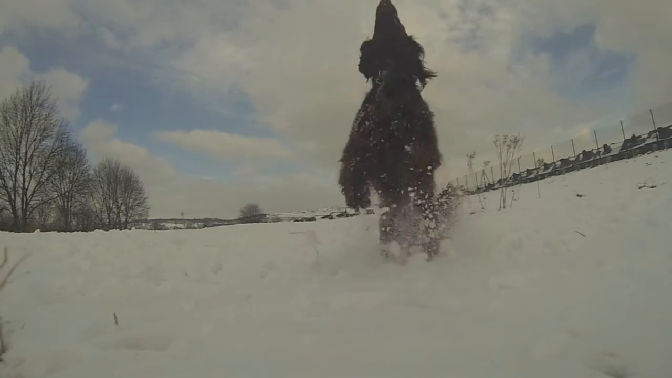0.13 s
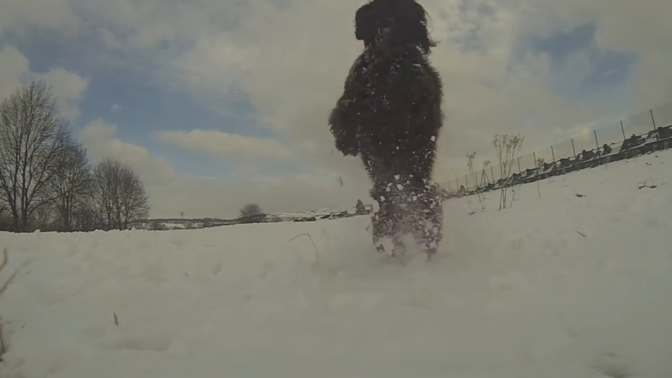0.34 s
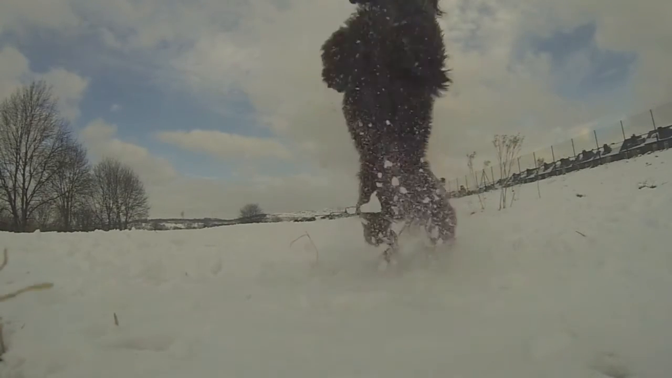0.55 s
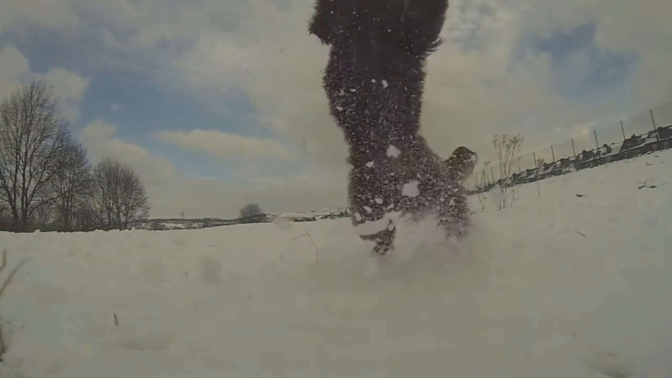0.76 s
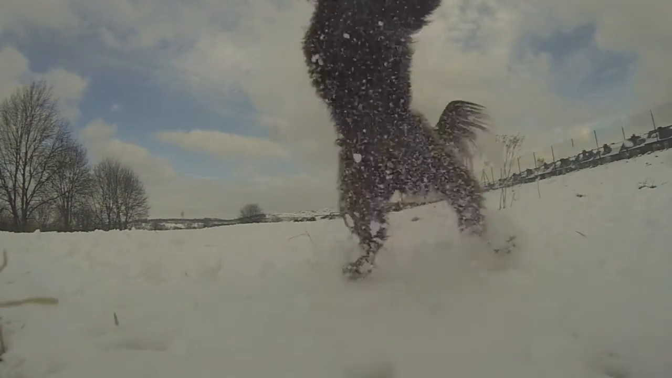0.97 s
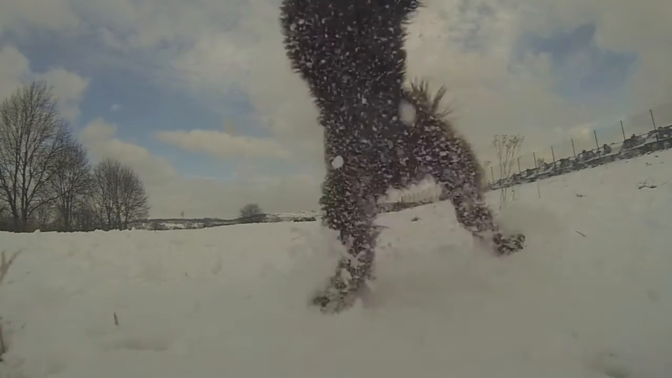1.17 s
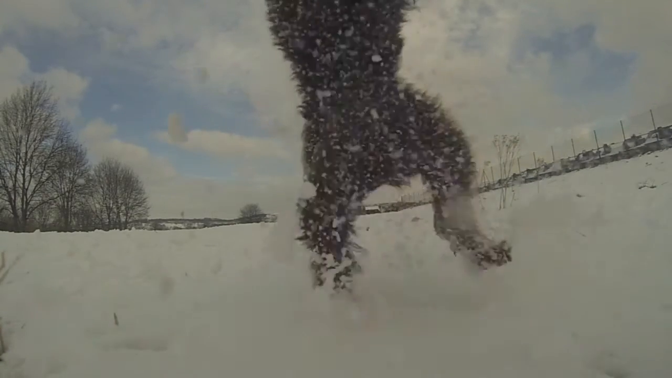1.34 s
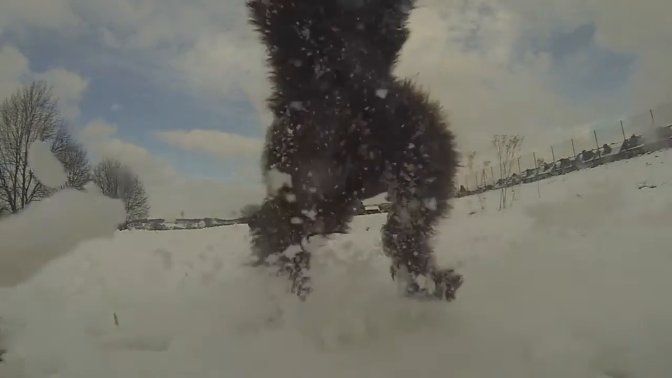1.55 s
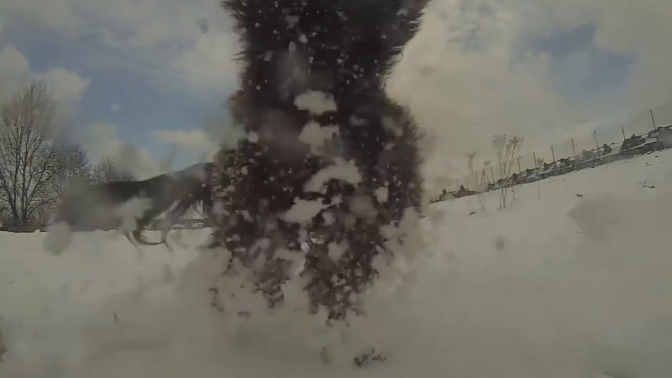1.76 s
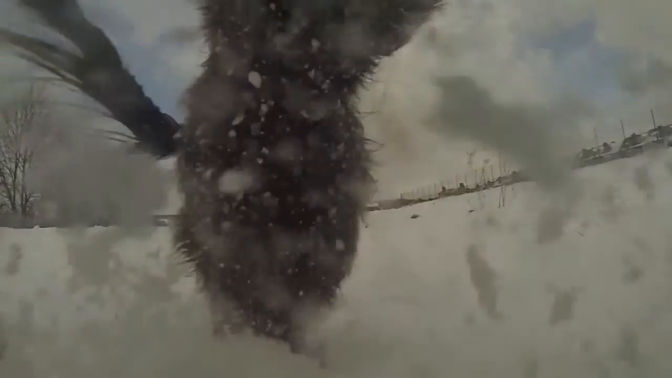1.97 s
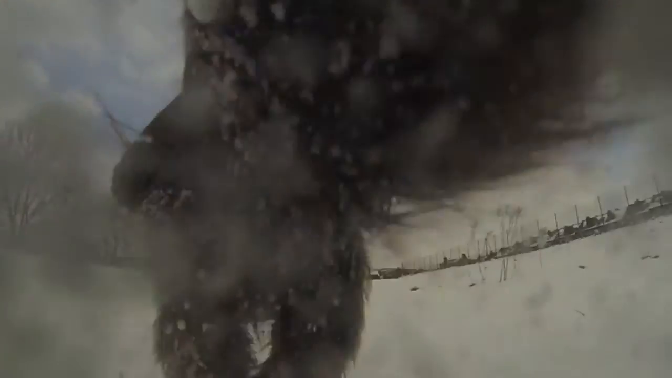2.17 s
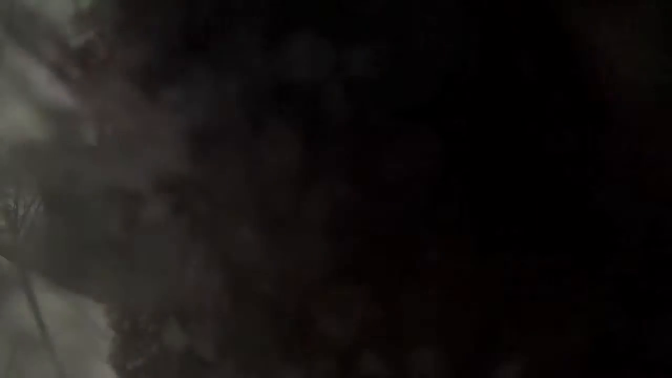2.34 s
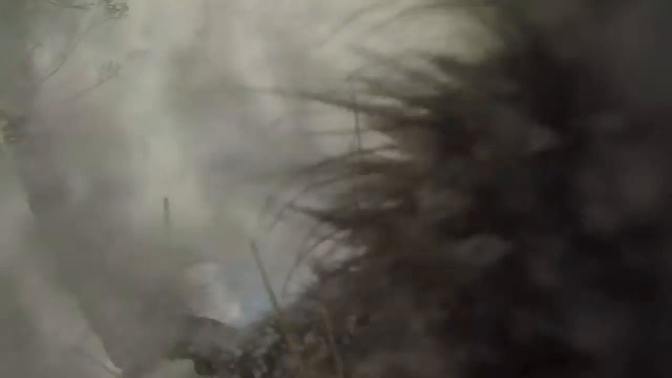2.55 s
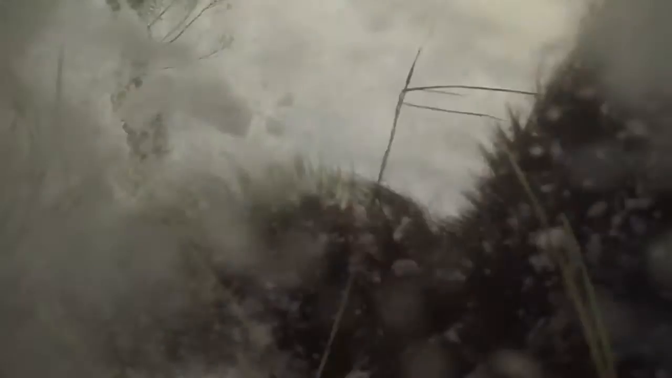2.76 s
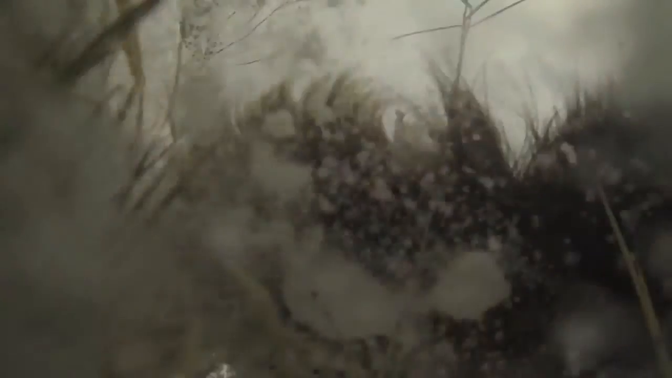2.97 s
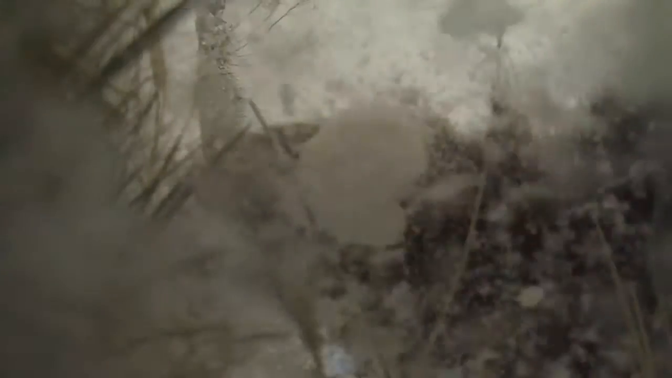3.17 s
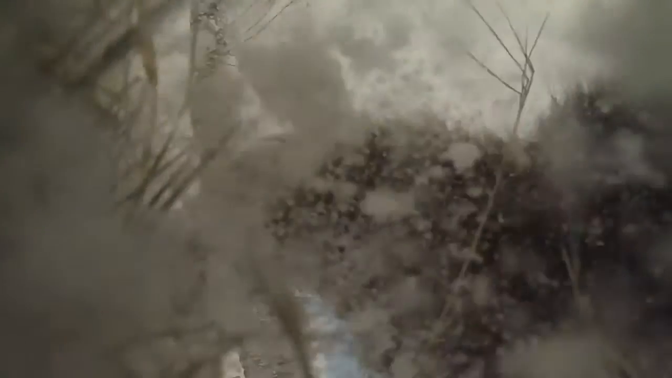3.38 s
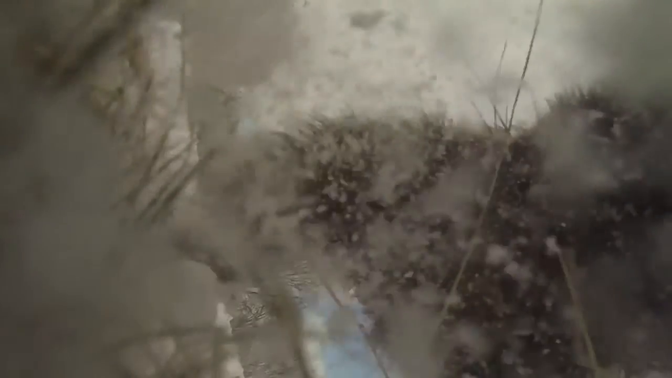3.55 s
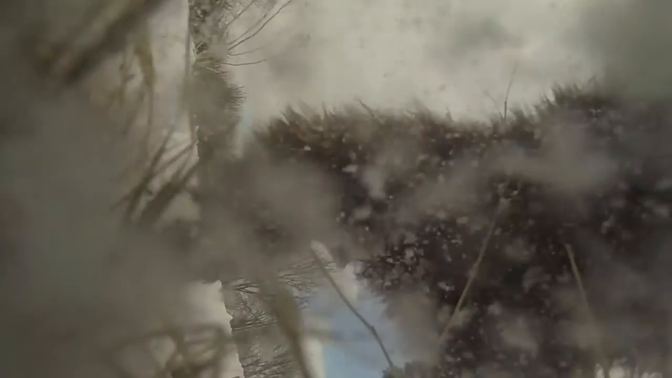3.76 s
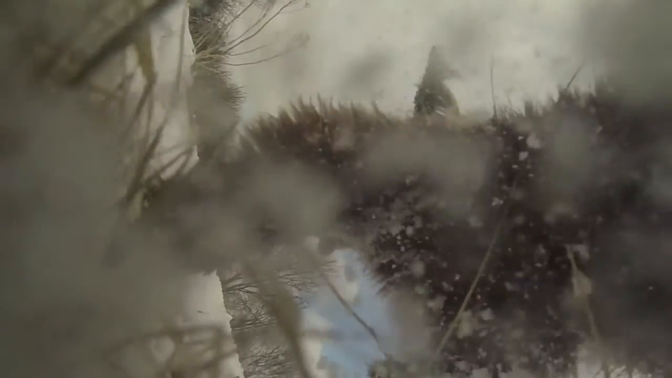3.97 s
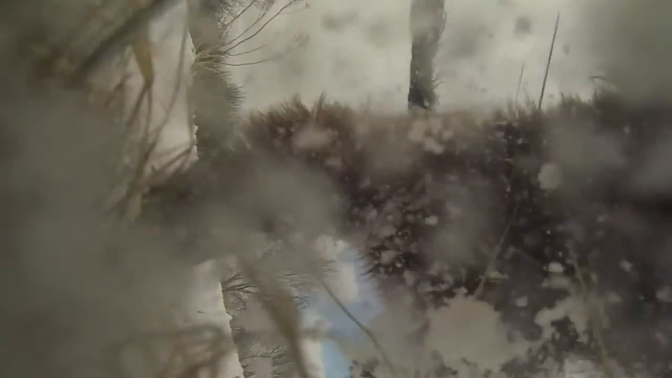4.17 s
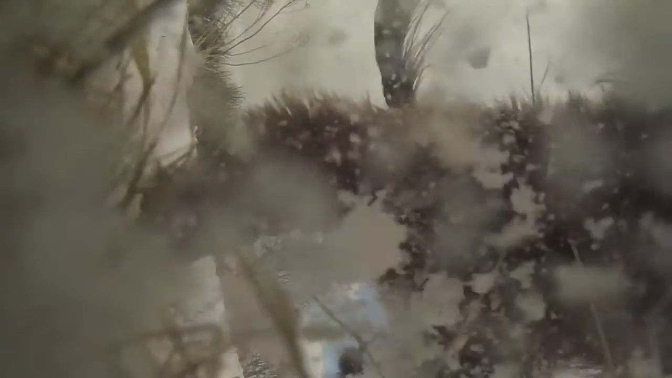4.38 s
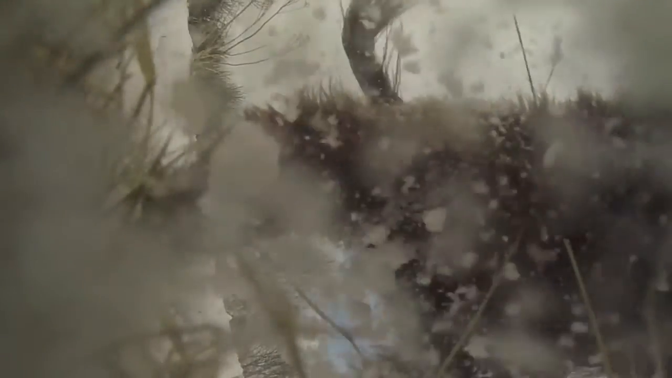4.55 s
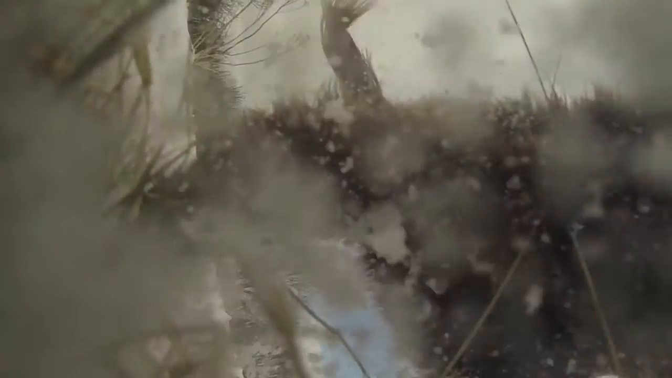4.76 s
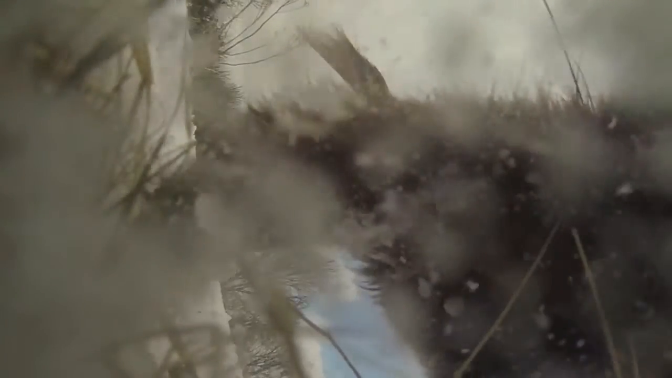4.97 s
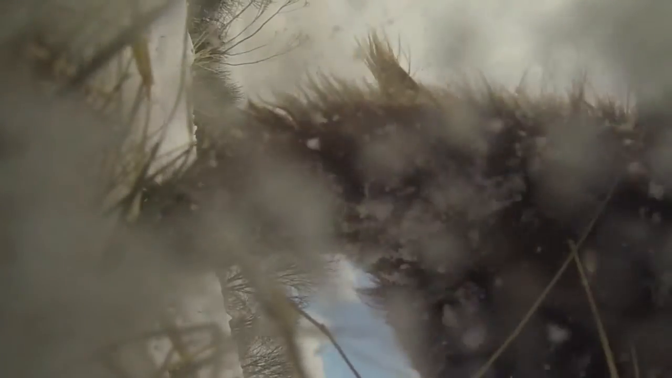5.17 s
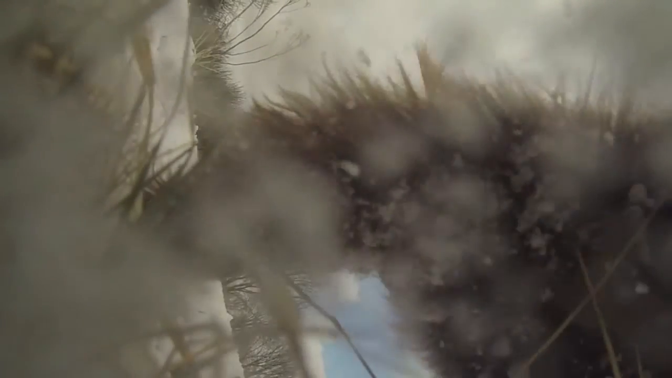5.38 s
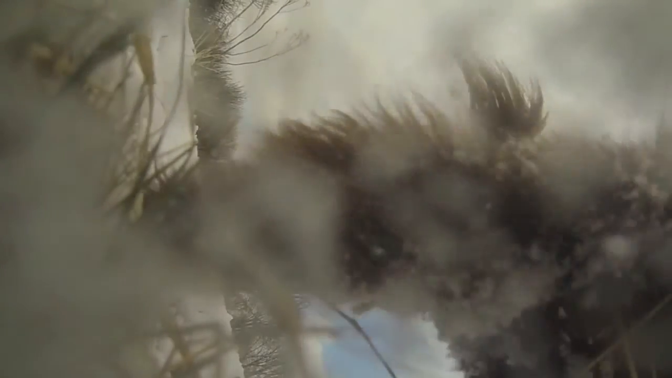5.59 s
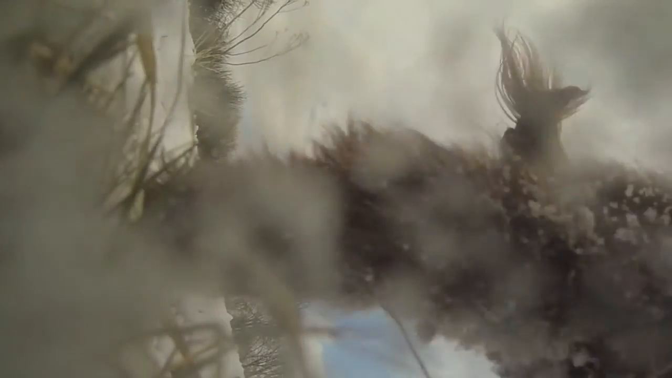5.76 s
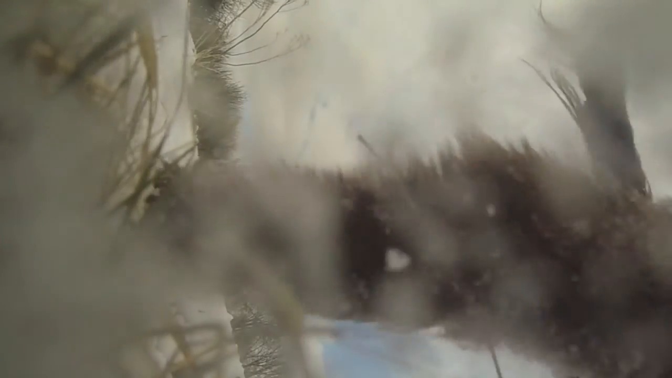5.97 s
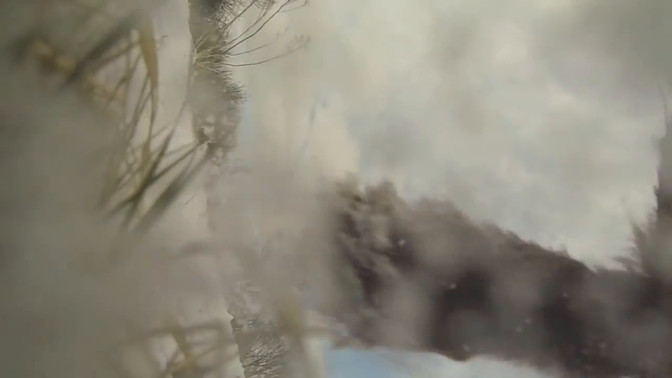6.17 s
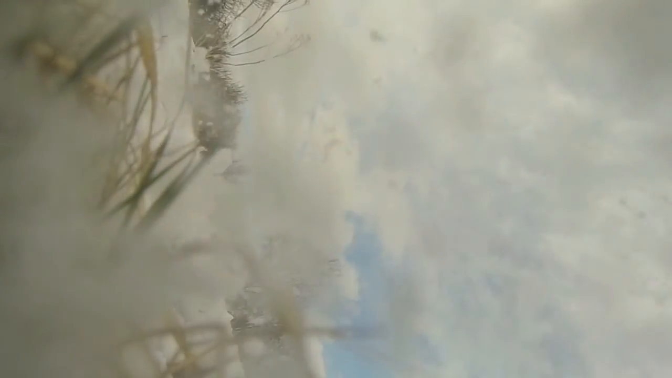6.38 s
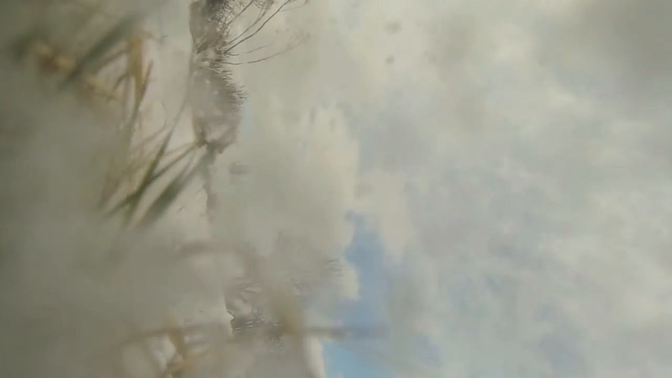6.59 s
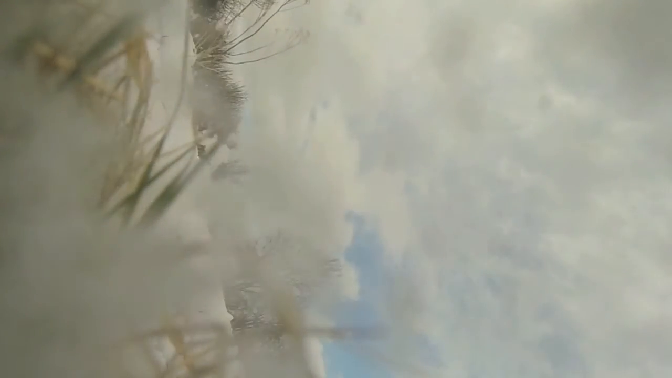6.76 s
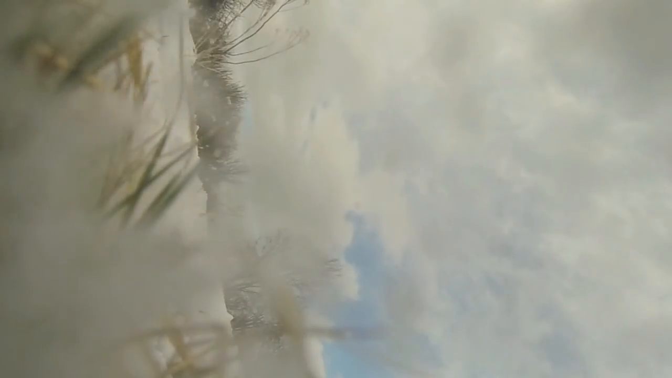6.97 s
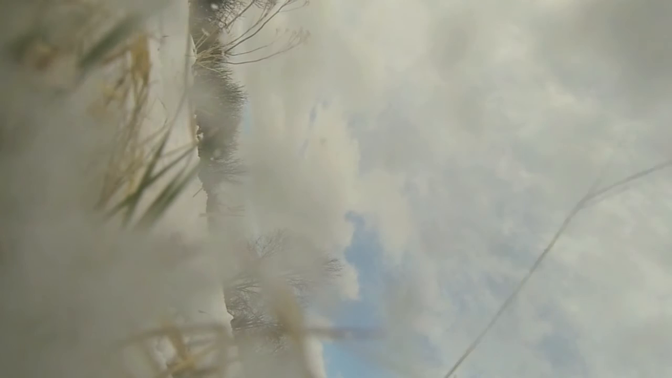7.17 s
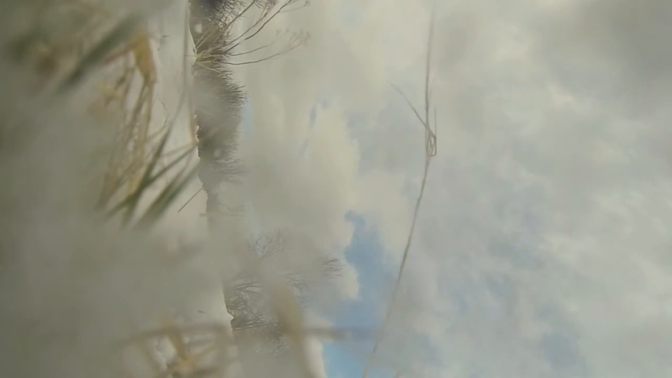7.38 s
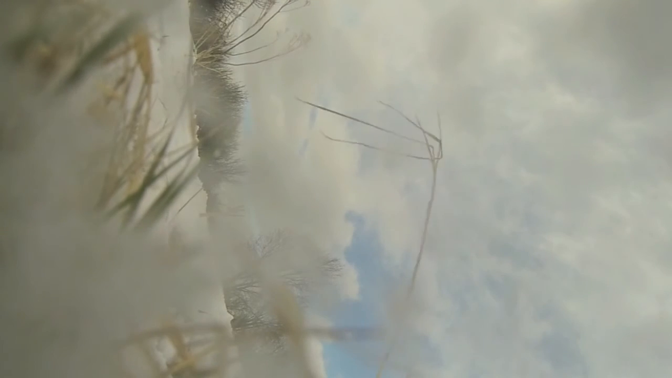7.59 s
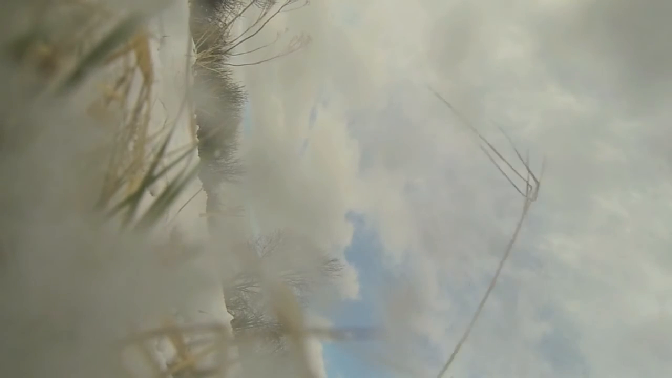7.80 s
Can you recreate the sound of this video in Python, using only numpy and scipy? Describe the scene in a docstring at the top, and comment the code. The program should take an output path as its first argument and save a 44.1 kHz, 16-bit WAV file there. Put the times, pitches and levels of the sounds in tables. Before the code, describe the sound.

Everything is slowed about five times and heard from inside a small sealed plastic camera lying in snow, so it is close, dull and boxy. It opens with a low heave of wind and little else but faint shell noise and a thin electronic hiss. At about 0.8 s a burst of kicked snow strikes the housing, followed by grainy scrapes and hollow taps, dense until 1.7 s. Around 1.75 s the dog bowls the camera over: a heavy, boomy thump with a deep swinging wobble. Thick muffled rubbing and knocks follow to about 2.9 s, then a lull. From 3.7 s fur brushes past with soft rustling and crisp crumbly taps, while strong bass swells surge around 5 to 5.7 s. After 6.3 s the contact thins, with a small tap near 6.8 s. At 7.5 s one loud hard knock rings very briefly, leaving faint rumble and hiss.

```python
"""In snow, from the microphone of a small sealed camera, heard five times slower than life, at no distance at all.
Wind heaves the membrane far down in the bass, as filtered noise; a long-haired dog kicks snow over the camera,
and fur and crumbs scrape and tap the plastic housing: noise grains and bursts through its dull resonances.
At 1.75 s the dog bowls it over and the trapped air swings, as decaying sines; then the dog brushes against it.
Near 7.5 s one hard knock rings. A faint steady shell noise and a narrow electronic hiss lie beneath it all."""
import sys
import numpy as np
from scipy import signal
from scipy.fft import rfft, irfft, next_fast_len
from scipy.io import wavfile
from scipy.ndimage import uniform_filter1d, map_coordinates

SR = 44100
rng = np.random.default_rng(int(sys.argv[2]) if len(sys.argv) > 2 else 0)


def unload_audio(sound):
    """Save the sound as a 16-bit wav file, at the path given as the first command line argument."""
    columns = np.transpose(np.atleast_2d(sound))
    # keep every value between -1 and 1, then stretch to whole-number steps
    steps = np.round(np.clip(columns, -1, 1) * 32767)
    wavfile.write(sys.argv[1], SR, steps.astype(np.int16))


N = 345203

# Wind and the dog's weight on the membrane: time_s, heave_db, buffet_db
PRESSURE_CURVE = [(0.06, -17, -52), (0.19, -32, -51), (0.55, -33.5, -54), (0.75, -35, -49),
                  (0.82, -22.5, -29), (0.92, -39, -47), (1.35, -30.5, -42), (1.7, -27.5, -36),
                  (1.95, -19.5, -31), (2.12, -18.5, -23), (2.35, -22.5, -43.5), (2.66, -15, -45),
                  (2.82, -20, -39.5), (2.92, -23, -48.5), (3.5, -30, -52), (3.62, -38.5, -38.5),
                  (3.9, -20, -37), (4.12, -31, -44), (4.88, -31.5, -52), (5.03, -19.5, -38),
                  (5.075, -21, -22), (5.13, -15, -26), (5.4, -15.5, -29.5), (5.5, -24.5, -31),
                  (5.66, -11, -29), (5.85, -26, -27), (6.15, -25, -43), (6.3, -32.5, -29), (6.48, -34, -47),
                  (6.8, -24.5, -47.5), (7.2, -37.5, -49.5), (7.4, -15.5, -51), (7.58, -44, -42.5),
                  (7.8, -27, -45)]
# Spectrum of the slow heave: pitch_hz, density_db (relative, per Hz)
HEAVE_SPECTRUM = [(1, -13.5), (3, -12), (7, -1), (12, 4), (20, -14), (30, -43), (60, -69), (100, -120)]
# Spectrum of the faster buffeting: pitch_hz, density_db (relative, per Hz)
BUFFET_SPECTRUM = [(12, -46.5), (22, -2), (35, -3.5), (58, -8), (70, -19.5), (95, -27), (200, -31.5),
                   (400, -67), (800, -120)]
# Fur and snow rubbing the housing: time_s, thud_db, scratch_db
RUB_CURVE = [(0.03, -73, -76.5), (0.535, -66.5, -76.5), (0.555, -48.5, -63), (0.6, -49.5, -63.5),
             (0.63, -55.5, -70.5), (0.79, -47.5, -64), (0.81, -27, -38.5), (0.9, -44.5, -46.5),
             (0.98, -44, -49.5), (1.06, -41.5, -55), (1.15, -50.5, -57), (1.25, -38, -42),
             (1.34, -36, -35.5), (1.5, -31.5, -43.5), (1.67, -39, -34.5), (1.8, -33, -44.5),
             (1.85, -33, -58), (1.89, -48.5, -74.5), (2.04, -36, -73.5), (2.07, -27, -69),
             (2.13, -33, -51.5), (2.19, -28, -63.5), (2.3, -29.5, -55.5), (2.41, -50, -61),
             (2.55, -35.5, -62.5), (2.73, -32.5, -54.5), (2.9, -32.5, -51.5), (2.94, -45, -62.5),
             (3.2, -56, -71), (3.55, -50, -65), (3.7, -41, -54.5), (3.84, -31.5, -51), (3.93, -42, -57),
             (4.3, -41.5, -50), (4.55, -38, -49), (4.9, -46.5, -50.5), (5.03, -34.5, -55.5),
             (5.2, -41, -53), (5.45, -47.5, -58), (5.68, -41.5, -59), (5.9, -49, -66.5), (6.27, -43.5, -61),
             (6.5, -53.5, -62), (6.92, -49, -65.5), (7.03, -62.5, -66), (7.49, -45, -69.5),
             (7.56, -59.5, -77.5), (7.8, -60.5, -69)]
# Crumbs and paws on the housing: start_s, level_db (relative), thud_db, edge_db (both against level_db),
# ring_hz, ring_db (against level_db)
TAP_EVENTS = [(0.81, -16, 0, -13, 419, -1.5), (0.87, -29, 5, -9.5, 566, -3),
              (0.935, -16.5, -25, -26, 550, -10), (1.044, -37, 0, -8.5, 598, -14.5),
              (1.066, -37, 4.5, -9, 611, -3), (1.101, -33, -2, -21.5, 610, -8),
              (1.169, -26, -13.5, -14.5, 600, -5), (1.206, -24.5, -13, -15.5, 870, -2),
              (1.47, -22, -5.5, -18.5, 513, -8), (1.504, -20.5, -5, -17.5, 542, -1.5),
              (1.542, -28.5, 2.5, -18.5, 550, -2), (1.594, -28.5, 3, -13.5, 553, -6),
              (1.693, -23, 7.5, -21, 525, -14), (1.757, -25, 17.5, -25.5, 463, 13),
              (1.79, -34, 14, -9.5, 500, 2.5), (1.811, -32, -1, -8.5, 498, -1),
              (1.831, -36, -2, -10, 545, 5), (2.067, -37.5, 18.5, -33, 525, -20),
              (2.116, -29, -2, -17.5, 703, 0.5), (2.156, -33, 4, -20.5, 514, 0),
              (2.133, -33.5, -1.5, -17, 600, -9), (2.213, -34.5, 9, -29, 446, 0),
              (2.247, -13, -14, -15.5, 447, -2), (2.461, -38, 11, -30, 533, -3),
              (2.518, -31.5, -15, -18, 452, -12), (2.581, -20, -3, -21, 450, -9),
              (2.729, -26, -9.5, -23, 630, -6.5), (2.787, -28, 7, -27.5, 475, -17),
              (3.681, -41, 5, -25, 558, -6.5), (3.731, -28, -11.5, -38.5, 566, 2),
              (3.831, -23, -3.5, -30, 610, -2.5), (3.989, -38, -10.5, -8.5, 519, -6),
              (4.053, -30.5, -8, -18, 595, -6), (4.081, -33, -8.5, -3.5, 548, -7.5),
              (4.191, -26.5, -19.5, -9.5, 950, 5), (4.271, -23, -8.5, -9.5, 953, -2),
              (4.329, -32.5, -4.5, -6, 610, -16), (4.357, -38.5, 5.5, -4, 625, -17),
              (4.411, -34.5, -5, -15.5, 935, -6), (4.563, -26, -14, -13, 943, 1),
              (4.62, -35, -6.5, -7, 930, -1), (4.804, -28.5, -12, -6.5, 1092, 0.5),
              (4.932, -31.5, -12, -20, 660, -6), (5.03, -30.5, 0.5, -29, 532, -3),
              (5.054, -27.5, -5.5, -30.5, 460, -4), (5.364, -33.5, -14.5, -22, 660, -6.5),
              (5.566, -32, -9, -6.5, 1445, 4), (5.94, -42, -11, -7, 1010, -7),
              (5.961, -32, 1, -14, 591, -5), (5.979, -33, -1, -14, 598, 4.5),
              (6.125, -42.5, -9, -1.5, 604, -9), (6.156, -39, -13, -17.5, 570, 8),
              (6.176, -40.5, -2, -31.5, 549, 12), (6.27, -40, 6.5, -19, 596, -6),
              (6.316, -44, 8.5, -22, 573, -1), (6.557, -47, 4, -9.5, 650, -15),
              (6.797, -21.5, -30, -19, 855, -11)]
# Modes of the plastic housing: pitch_hz, width_hz, level_db
HOUSING_MODES = [(297.3, 56.4, -0.5), (573.7, 33, -14), (356, 21, -8.5), (675, 24, -16.5),
                 (1060, 82, -18.5), (1473, 190, -20.5), (2043, 550, -27.5), (2530, 270, -30.5)]
# Response of the housing wall between its modes: pitch_hz, level_db
WALL_RESPONSE = [(40, -63.5), (100, -19), (190, -26), (500, -25.5), (1200, -23.5), (3000, -46)]
# Trapped air swinging as the camera is bowled over: start_s, pitch_hz, level_db, t60_s
AIR_SWINGS = [(1.7545, 280, -6, .06), (1.7605, 43, 6, .2), (1.783, 95, -12, .2), (1.805, 6.5, -7, 1.6)]
# The wall pressed in, one push: start_s, length_s, level_db
WALL_PUSH = (1.772, .036, 1)
# One hard knock: start_s, pitch_hz, level_db, rise_s (time constant), contact_s, t60_s
HARD_KNOCK = (7.5095, 296, 3, .0018, .009, .036)
# Parts that ring after the knock: pitch_hz, level_db (before a random waver), t60_s
KNOCK_RINGS = [(619, -2.5, 0.019), (730, -40, 0.28), (1150, -53.5, 0.36), (580, -42.5, 0.2),
               (930, -53.5, 0.24)]
# Faint hiss of the electronics: pitch_hz, half_width_hz (at half amplitude), level_db
CIRCUIT_HISS = (1505, 22, -80)
# Air and snow stirring the shell at rest, one level each: thud_db, rustle_db, scratch_db
REST_LEVELS = [-72.5, -70.5, -86]
# Faint ripple of the resampler's gain: pitch_hz, depth_db
GAIN_RIPPLE = (3900, -71)
# Spread of the small crumbs, one value each: level_db, thud_db, edge_db, ring_hz, ring_db
CRUMB_SPREAD = [2.5, 3, 3, 40, 3]

LUMPS_DB = 2.8  # depth of the buffeting's lumps
RUSTLE_SHARE, RUSTLE_DB = 0.66, 3.5  # rustle: share of the way from thud to scratch, then lift in dB
TAP_RISE_S, TAP_T60_S = 0.00082, 0.048  # at the usual edge
DULL_DRAG, USUAL_EDGE_DB = .3, -16.5  # less edge, slower tap: dB of time per dB of edge lost
CRUMBS_PER_S = 6
CRUMB_DB = 5  # average level over the rustle
CRUMB_THUD_DB, CRUMB_EDGE_DB, CRUMB_RING_HZ, CRUMB_RING_DB = -2, -15, 566, -5.5
SLOW_RATE_HZ, BAND_HZ, TOP_HZ = 9600, 3060, 15600  # spread-out sample rate, band before it, top after it


def amp(db):
    """Amplitude for a level in dB."""
    return 10 ** (np.asarray(db) / 20)


def unit(x):
    """Scale to an rms of one."""
    return x / np.sqrt(np.mean(x ** 2) + 1e-20)


def along(points, hz):
    """Interpolate (Hz, value) points on a log frequency axis."""
    f, v = np.transpose(points)
    return np.interp(np.log(hz + .1), np.log(f + .1), v)


def curves(rows):
    """One value per sample for each column after the time."""
    s, *cols = np.transpose(rows)
    return [np.interp(np.arange(N) / SR, s, c) for c in cols]


def wobble(rate):
    """A smooth random curve, rate knots a second."""
    knots = rng.standard_normal(int(N * rate / SR) + 4)
    return map_coordinates(knots, [np.arange(N) * rate / SR])


def filtered(x, response):
    """Multiply the spectrum of x by a response of frequency."""
    m = 2 * next_fast_len(N // 2 + SR)
    return irfft(rfft(x, m) * response(np.fft.rfftfreq(m, 1 / SR)), m)[..., :N]


def add(out, s, sound):
    """Lay a sound into out at s seconds."""
    part = out[round(s * SR):][:len(sound)]
    part += sound[:len(part)]


def housing(hz):
    """Causal response of the plastic shell: its resonant modes over a sloping wall."""
    power = amp(along(WALL_RESPONSE, hz)) ** 2
    for c, width, db in HOUSING_MODES:
        damping = (hz * width) ** 2
        mode = amp(db) ** 2 * damping / ((c * c - hz * hz) ** 2 + damping)
        power = power + mode * np.minimum(1, c / (hz + 1)) ** 2 * np.minimum(1, hz / c) ** 2
    # folding the cepstrum forward gives minimum phase: nothing sounds before the hit
    cepstrum = irfft(np.log(power + 1e-12) / 2)
    cepstrum[1:len(cepstrum) // 2] *= 2
    cepstrum[len(cepstrum) // 2 + 1:] = 0
    return np.exp(rfft(cepstrum))


def thirds(drives):
    """Thud, middle and edge of the shell's answer to three drives."""
    bands = [(430, "low"), ((430, 950), "band"), (950, "high")]
    parts = []
    for answer, (hz, kind) in zip(filtered(drives, housing), bands):
        sos = signal.butter(3, hz, kind, fs=SR, output="sos")
        parts.append(signal.sosfilt(sos, answer))
    return np.array(parts)


def whine():
    """Circuit noise in a narrow band, as noise under one steady peak."""
    pitch_hz, half_width_hz, level_db = CIRCUIT_HISS
    noise = rng.standard_normal(N)
    return amp(level_db) * unit(filtered(noise, lambda f: 1 / (1 + ((f - pitch_hz) / half_width_hz) ** 2)))


def still():
    """Air and snow stir the shell at rest: steady faint noise in its resonances."""
    parts = thirds(rng.standard_normal((3, N)))
    return sum(amp(db) * unit(part) for db, part in zip(REST_LEVELS, parts))


def wind():
    """Slow pressure swings of the membrane, with faster lumps of buffeting on top."""
    heave_db, buffet_db = curves(PRESSURE_CURVE)
    heave = filtered(rng.standard_normal(N), lambda hz: amp(along(HEAVE_SPECTRUM, hz)))
    # evened out over about 0.2 s, so that the swings never die out
    local_power = uniform_filter1d(heave ** 2, 9000)
    heave = heave / np.sqrt(local_power + 2.0 * np.mean(heave ** 2))
    buffet = filtered(rng.standard_normal(N), lambda hz: amp(along(BUFFET_SPECTRUM, hz)))
    lumps = amp(LUMPS_DB * wobble(9)) * buffet
    return amp(heave_db) * unit(heave) + amp(buffet_db) * unit(lumps)


def bowl_over():
    """The tumble swings the air inside the shell and presses its wall in: decaying sines and one half sine."""
    out, t = np.zeros(N), np.arange(2 * SR) / SR
    for s, hz, db, t60 in AIR_SWINGS:
        add(out, s, amp(db - 60 * t / t60) * np.sin(2 * np.pi * hz * t))
    s, length, db = WALL_PUSH
    add(out, s, -amp(db) * np.sin(np.pi * np.minimum(t / length, 1)))
    return out


def knock():
    """A hard knock holds while in contact, then dies away; loose tones ring and a noise crack goes through the shell."""
    out, crack, t = np.zeros(N), np.zeros(N), np.arange(2 * SR) / SR
    s, hz, db, rise, contact, t60 = HARD_KNOCK
    swell = 1 - np.exp(-t / rise)
    level = amp(db - 60 * np.maximum(t - contact, 0) / t60)
    add(out, s, -level * swell * np.sin(2 * np.pi * hz * t))
    for hz, db, t60 in KNOCK_RINGS:
        waver_db = 5.8 * wobble(40)[:len(t)]
        add(out, s, swell * amp(db - 60 * t / t60 + waver_db) * np.sin(2 * np.pi * hz * t))
    add(crack, s, amp(3 - 60 * t / .045) * swell * rng.standard_normal(len(t)))
    return out + filtered(crack, housing)


def rub_levels():
    """Thud, rustle and scratch levels of the rubbing in dB."""
    thud_db, scratch_db = curves(RUB_CURVE)
    rustle_db = RUSTLE_DB + thud_db + RUSTLE_SHARE * (scratch_db - thud_db)
    return np.array([thud_db, rustle_db, scratch_db])


def crumbs():
    """Tap rows for many small crumbs at random times, as strong as the rubbing that throws them."""
    count = int(CRUMBS_PER_S * N / SR)
    s = rng.random(count) * (N - 1) / SR
    mean = [CRUMB_DB, CRUMB_THUD_DB, CRUMB_EDGE_DB, CRUMB_RING_HZ, CRUMB_RING_DB]
    rows = mean + rng.standard_normal((count, 5)) * CRUMB_SPREAD
    rows[:, 0] += rub_levels()[1][(s * SR).astype(int)]
    return list(np.column_stack([s, rows]))


def taps():
    """Each tap is a short crumbling burst into the shell, and the spot that it hits rings briefly."""
    drives, rings, t = np.zeros((3, N)), np.zeros(N), np.arange(SR // 4) / SR
    for s, db, thud_db, edge_db, hz, ring_db in list(TAP_EVENTS) + crumbs():
        # a dull tap is softer at the start and lasts longer
        paced_t = t * amp(DULL_DRAG * (edge_db - USUAL_EDGE_DB))
        shape = amp(-60 * paced_t / TAP_T60_S) * (1 - np.exp(-paced_t / TAP_RISE_S))
        for drive, more_db in zip(drives, (thud_db, 0, edge_db)):
            add(drive, s, amp(db + more_db) * shape * rng.standard_normal(len(t)))
        add(rings, s, amp(db + ring_db) * shape * np.sin(2 * np.pi * hz * t))
    return amp([30, 30, 44]) @ thirds(drives) + amp(3) * rings


def rub():
    """Hairs and crumbs slip over the shell: clumped scrapes of unequal size on a soft hiss."""
    levels_db = rub_levels()
    # hard scratching makes the scrapes denser, and each one smaller to match
    pace = amp(0.45 * (levels_db[2] + 52.0))
    starts = rng.random(N) < 350 * pace * amp(5 * wobble(30)) / SR
    sizes = amp(np.minimum(3.1 * rng.exponential(size=N), 13)) / np.sqrt(pace)
    hits = starts * sizes * amp(4.4 * rng.standard_normal((3, N)))
    fade = amp(-60 / (0.017 * SR))  # each scrape falls 60 dB in 17 ms
    scrapes = signal.lfilter([1], [1, -fade], hits)
    hiss = 0.92 * amp(0.53 * wobble(5.5))
    slips = (unit(scrapes) + hiss) * rng.standard_normal((3, N))
    return sum(amp(db + 0.96 * wobble(9.8)) * unit(part) for db, part in zip(levels_db, thirds(slips)))


def scene():
    """Everything that reaches the microphone, background first."""
    return (whine() + still() + wind() + bowl_over() + knock() + taps() + rub())[None]


def record(dry):
    """The converter clips; slowing down spreads samples apart, and straight lines between them mirror the band."""
    clipped = dry / (1 + np.abs(dry / .99) ** 12) ** (1 / 12)
    band = filtered(clipped, lambda hz: hz < BAND_HZ)[0]
    t = np.arange(N) / SR
    sparse_t = np.arange(int(N / SR * SLOW_RATE_HZ) + 2) / SLOW_RATE_HZ
    sparse = map_coordinates(band, [sparse_t * SR], mode="nearest")
    # the lines are drawn at three times the output rate, then brought down
    fine = np.interp(np.arange(3 * N) / (3 * SR), sparse_t, sparse)
    joined = signal.resample_poly(fine, 1, 3)
    ripple_hz, ripple_db = GAIN_RIPPLE
    joined = joined * (1 + amp(ripple_db) * np.sin(2 * np.pi * ripple_hz * t))
    return np.clip(filtered(joined, lambda hz: hz < TOP_HZ), -1, 1)[None]


dry = scene()
out = record(dry)
unload_audio(out)
```